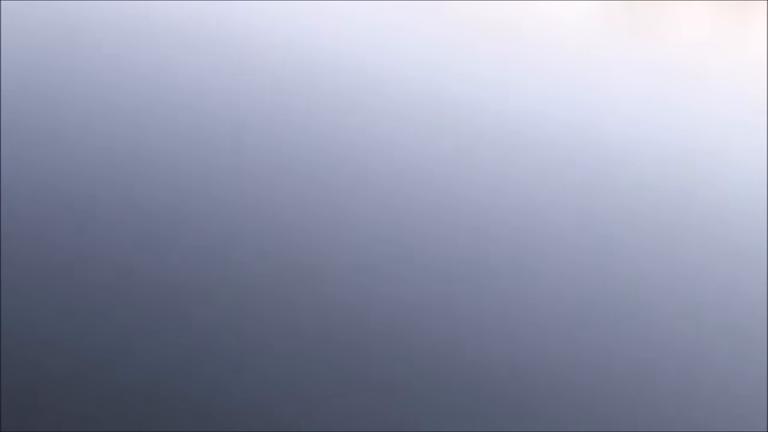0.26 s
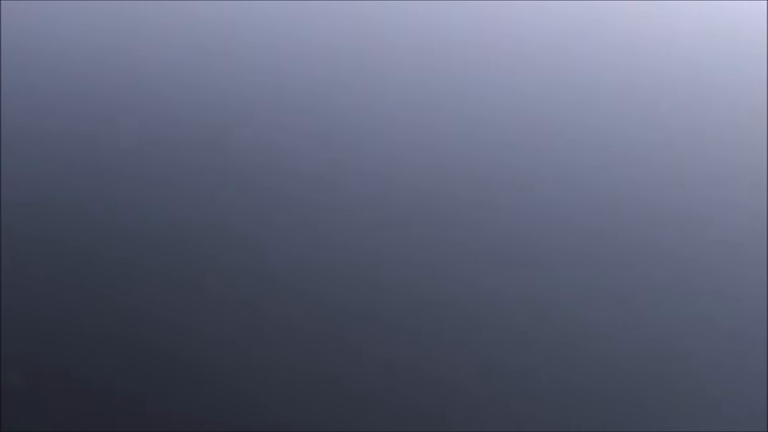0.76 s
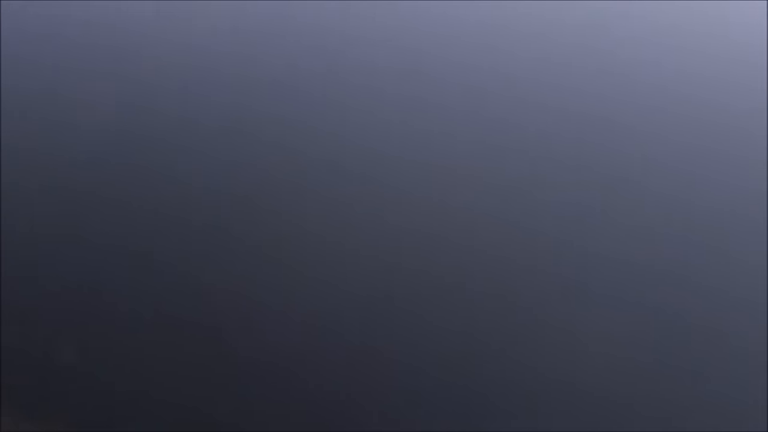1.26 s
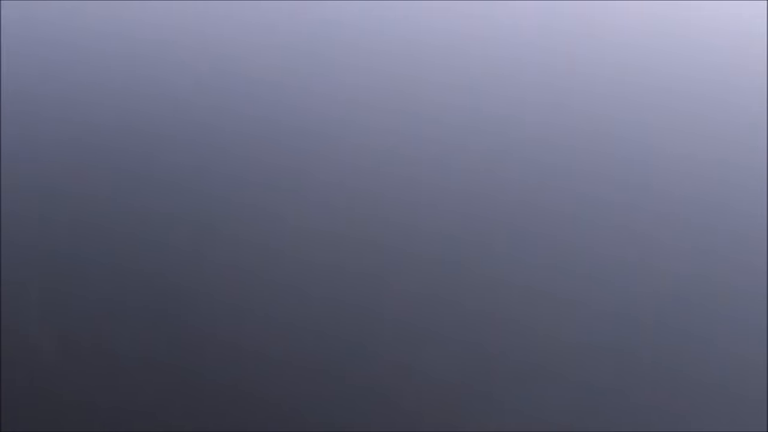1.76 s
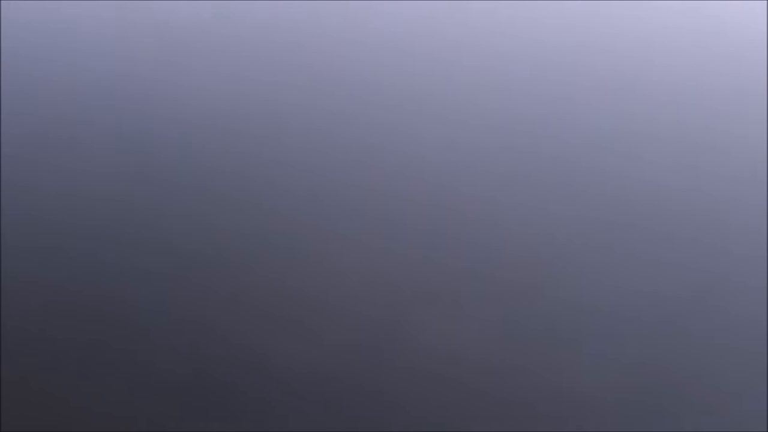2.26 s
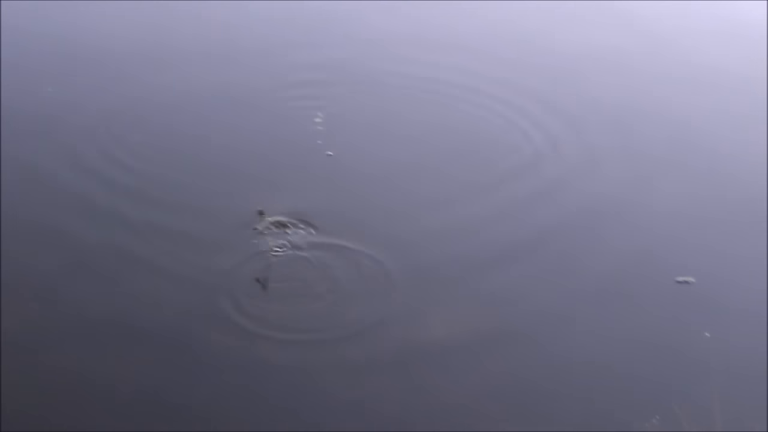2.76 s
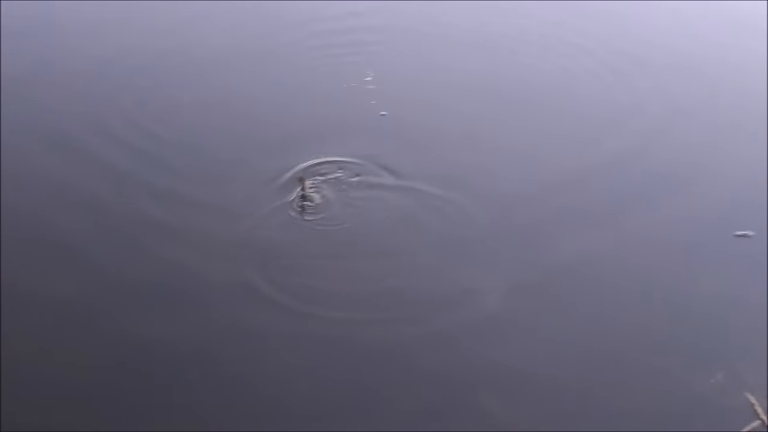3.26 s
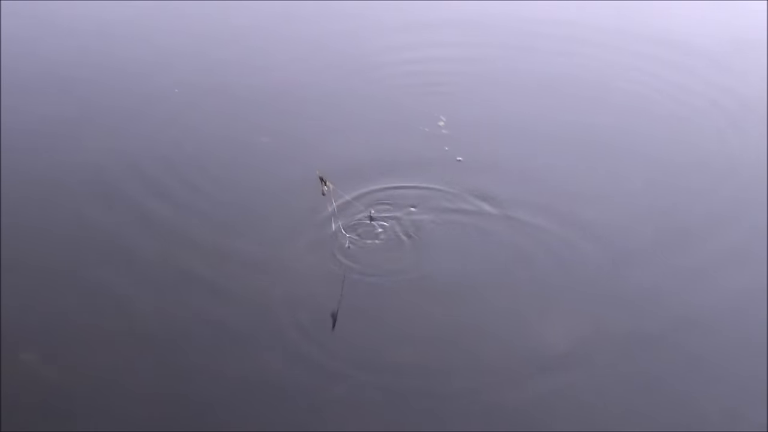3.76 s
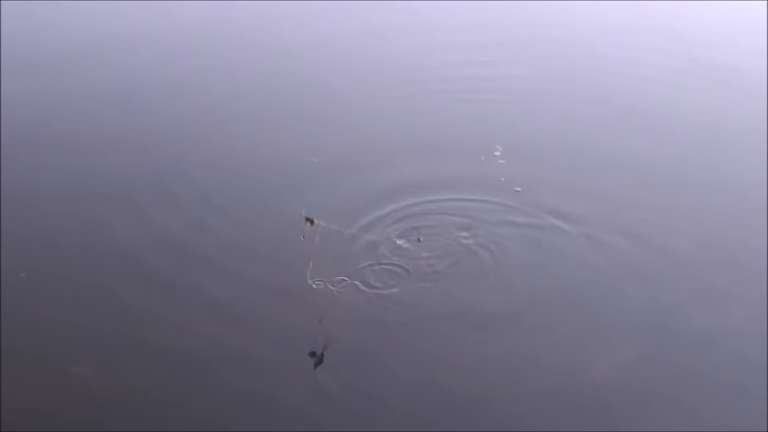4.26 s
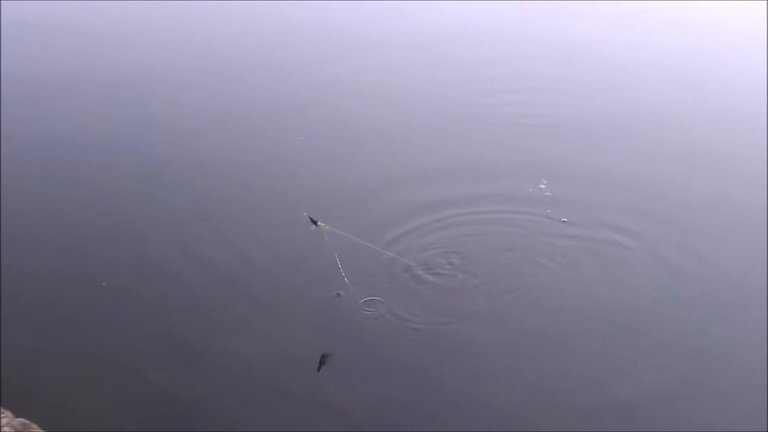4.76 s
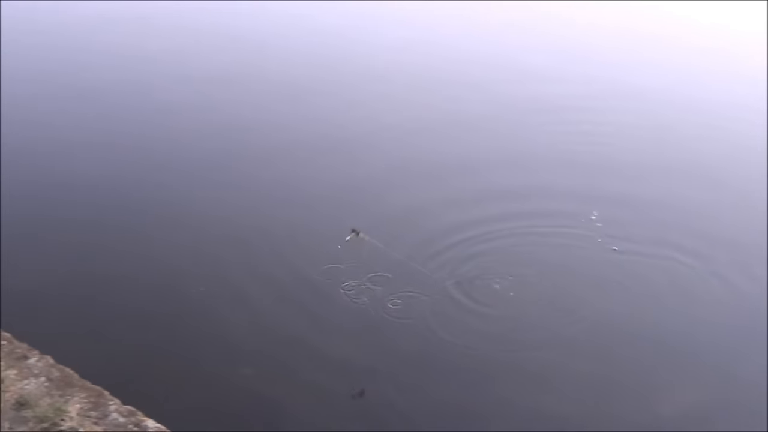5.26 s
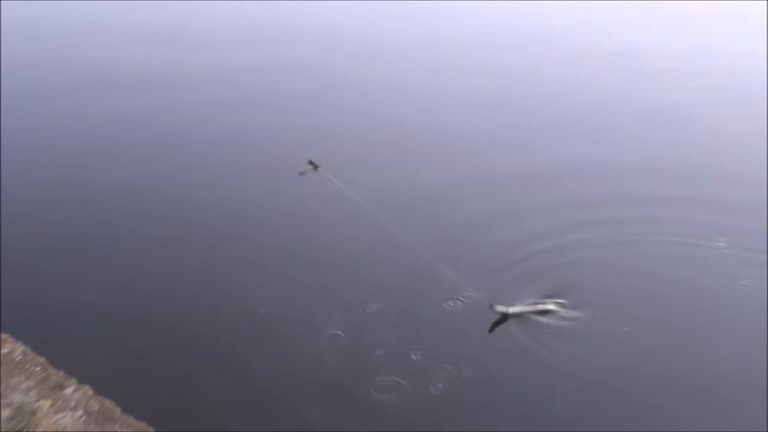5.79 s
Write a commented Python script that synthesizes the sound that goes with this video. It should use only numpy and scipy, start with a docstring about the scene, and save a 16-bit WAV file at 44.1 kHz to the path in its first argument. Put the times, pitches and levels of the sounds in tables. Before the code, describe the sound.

A small pellet bell on a fishing rod jingles in restless shakes beside a quiet lake, with clothing rustles, clicks and sharp coot calls echoing.

```python
"""A quiet lake: soft outdoor air (coloured noise) lies over a low distant hum, with a faint high whine.
Clothing rustles close by (flickering noise), and a small pellet bell on a fishing rod jingles as a hooked
fish tugs the line (decaying tones). Songbirds whistle far off (gliding tones); tackle clicks (short noise)
and soft bumps (damped notes) follow. Near 3 s a coot starts five sharp calls (strong overtones in bursts),
which echo from the bank."""
import sys
import numpy as np
from scipy import signal
from scipy.fft import rfft, irfft, next_fast_len
from scipy.io import wavfile
from scipy.ndimage import map_coordinates

SR = 44100
rng = np.random.default_rng(int(sys.argv[2]) if len(sys.argv) > 2 else 0)


def waveform_to_disk(signal):
    """Save audio, clipped to [-1, 1], as 16-bit WAV at the path in sys.argv[1]."""
    frames = np.transpose(np.atleast_2d(signal))
    scaled = np.clip(frames, -1, 1) * 32767
    samples = np.round(scaled).astype(np.int16)
    wavfile.write(sys.argv[1], SR, samples)


N = 265923


def amp(db):
    """Turn decibels into a gain."""
    return 10 ** (np.asarray(db) / 20)


def unit(x):
    """Scale x to an average (rms) level of 1."""
    return x / np.sqrt(np.mean(x ** 2) + 1e-20)


def fade(t, t60):
    """Die away exponentially, by 60 dB in t60 seconds."""
    return np.exp(-np.log(1000) * t / t60)


def seconds(length):
    """Give the sample times over a length in seconds."""
    return np.arange(int(length * SR)) / SR


def along(points, hz):
    """Read a curve of (frequency, value) points on a log frequency axis."""
    f, v = np.transpose(points)
    return np.interp(np.log(hz + 1), np.log(f + 1), v)


def over_time(points):
    """Draw straight lines through (time, value) points, over the whole scene."""
    return np.interp(np.arange(N) / SR, *np.transpose(points))


def left_right(db):
    """Left and right gains from a left-minus-right level in dB."""
    return amp(np.outer([.5, -.5], db))


def wobble(rate):
    """A smooth random curve with a new random knot `rate` times a second."""
    knots = rng.standard_normal(int(N * rate / SR) + 4)
    return map_coordinates(knots, [np.arange(N) * rate / SR])


def filtered(x, response):
    """Multiply the spectrum of x by a response, given as a function of frequency."""
    m = next_fast_len(N + SR // 2)
    return irfft(rfft(x, m) * response(np.fft.rfftfreq(m, 1 / SR)), m)[..., :N]


def add(track, s, sound):
    """Mix a sound into a track, starting at time s."""
    part = track[..., max(round(s * SR), 0):][..., :sound.shape[-1]]
    part += sound[..., :part.shape[-1]]


def noise(spectrum, alike):
    """Coloured stereo noise of rms 1; `alike` says how similar left and right are at each frequency."""
    def mid_side(hz):
        turn = np.arccos(np.clip(along(alike, hz), -1, 1)) / 2
        return amp(along(spectrum, hz)) * [np.cos(turn), np.sin(turn)]

    mid, side = filtered(rng.standard_normal((2, N)), mid_side)
    return unit(np.array([mid + side, mid - side]))


def echo(x, t60s, delay, build, width=0.19):
    """A diffuse stereo tail that builds up after a delay; each frequency dies at its own speed."""
    hz, _, z = signal.stft(rng.standard_normal((2, SR)), SR, nperseg=256)
    t = np.linspace(0, 1, z.shape[-1])
    shaped = z * fade(t, along(t60s, hz)[:, None]) * (1 - np.exp(-t / build))
    tail = signal.istft(shaped, SR, nperseg=256)[1]
    tail = tail / np.linalg.norm(tail[0])
    late = np.pad(x, (int(delay * SR), 0))[None]
    mid, side = signal.oaconvolve(late, tail, axes=1)[:, :N]
    return np.array([mid + width * side, mid - width * side])


# colour of the outdoor air: (frequency [Hz], level [dB per Hz])
AIR_COLOUR = [(20, -44), (35, -18), (65, -8.5), (210, -10), (330, -1), (600, -8.5), (880, -9), (1500, -17),
              (3000, -20), (4000, -23), (5200, -21.5), (8500, -24.5), (10900, -32.5), (15000, -29.5)]
# how similar the air is in both ears: (frequency [Hz], left-right likeness [share])
AIR_ALIKE = [(30, 0.46), (120, 0.84), (300, 0.95), (1000, 0.95), (4000, 1), (8000, 0.7), (13000, 1)]
# which side the air leans to: (frequency [Hz], left minus right level [dB])
AIR_LEAN = [(40, 10), (90, -0.5), (180, 4), (330, -7.5), (700, 1), (1400, -0.5), (3000, 0.5)]
# slow rise and fall of the low hum: (time [s], gain [dB])
HUM_GAIN = [(0, 1), (2.2, 2.65), (4, 2.5), (5.2, -1.5)]
AIR_DB = -48  # middle of the air's wandering level


def countryside(corner_hz=800):
    """Soft outdoor air; its low part, the distant hum, swells a little and then slowly ebbs."""
    air = noise(AIR_COLOUR, AIR_ALIKE) * amp(AIR_DB + 0.82 * wobble(3.41))
    air = filtered(air, lambda hz: left_right(along(AIR_LEAN, hz)))
    hum = filtered(air, lambda hz: 1 / (1 + (hz / corner_hz) ** 2))
    return air - hum + hum * amp(over_time(HUM_GAIN))


# strokes of a sleeve: (time of the peak [s], rise time constant [s], swish level [dB], rub level [dB])
SLEEVE_STROKES = [(.115, 0.14, -39.5, -54), (.275, 0.099, -35.5, -59), (0.416, 0.024, -36.5, -40.5),
                  (.715, 0.02, -50, -74), (1.075, 0.015, -34, -51.5), (1.257, 0.094, -32.5, -40.5),
                  (1.405, 0.082, -42.5, -44.5)]
# colour of the bright swish: (frequency [Hz], level [dB per Hz])
SWISH_COLOUR = [(1400, -17.5), (2400, -11.5), (3800, -16), (5500, -8.5), (7600, 2.5), (8800, -5.5),
                (10700, -17), (12500, -22), (15000, -30)]
# colour of the duller rub: (frequency [Hz], level [dB per Hz])
RUB_COLOUR = [(25, -20), (60, 5), (120, -2), (450, 7.5), (900, 5), (1400, 3.5), (2200, 0.5), (4000, -18)]
RELEASE_S = 0.052  # a stroke dies away with this time constant


def clothing(grain_db=4.0, crackle_db=-2, rate=130):
    """Fabric slides in tiny catches: a bright swish over a duller rub, crackling where it creases."""
    peak, rise, swish, rub = np.transpose(SLEEVE_STROKES)[..., None]
    t = np.arange(N) / SR - peak
    speed = np.exp(np.minimum(t / rise, -t / RELEASE_S))

    def level(db):
        return np.linalg.norm(amp(db) * speed, axis=0)

    catches = unit(amp(grain_db * wobble(350)))
    sliding = level(swish) * noise(SWISH_COLOUR, [(4000, 0.99)])
    sliding = sliding + level(rub) * noise(RUB_COLOUR, [(500, 0.99)])
    creases = (rng.random(N) < rate / SR) * rng.exponential(size=N)  # about `rate` a second
    snaps = unit(signal.oaconvolve(creases, fade(seconds(.01), 0.0069))[:N])
    colour = [(400, -12), (1500, -2), (2800, -3), (6000, -1), (12000, -33)]
    crackle = snaps * noise(colour, [(2000, 0.98)])
    return catches * sliding + level(rub + crackle_db) * crackle


PRESS_HZ = 406  # the main tone starts this much sharp
PRESS_S = .0006  # typical time constant of the pellet's press


def main_ring(t, t60, press_s=PRESS_S):
    """The shell's main tone swells in about a millisecond, briefly sharp while the pellet presses on it."""
    hz = 3998 + PRESS_HZ * np.exp(-t / press_s)
    return np.sin(2 * np.pi * np.cumsum(hz) / SR) * fade(t, t60) * (1 - np.exp(-t / press_s))


def clink(t, hz=4230, t60=0.012):
    """A light contact: a heavily damped note a little above the main tone."""
    return np.sin(2 * np.pi * hz * t) * fade(t, t60) * (1 - np.exp(-t / 0.00059))


FIRM_DB = -18  # strength of a firm strike, the reference for the settings below
RING_S, RING_GROWS = 0.046, 0.033  # t60 [s] after a firm strike, and its growth [1/dB, exponential]


def ring_time(db):
    """A harder strike throws the pellet clear, so the main tone rings longer: its t60."""
    return RING_S * np.exp(RING_GROWS * (db - FIRM_DB))


# the rod tip jerks and throws the pellet against the shell: (time [s], strength [dB])
STRIKES_ON_SHELL = [(0.011, -14), (0.066, -19), (0.1165, -19.5), (0.2189, -26.5), (0.3268, -21),
                    (0.414, -23), (0.5206, -26), (0.584, -20.5), (0.7042, -25), (0.9272, -26.5),
                    (0.9968, -28.5), (1.073, -18), (1.3268, -19.5), (1.4622, -29.5), (1.5169, -25.5),
                    (1.58, -24.5), (1.605, -22), (1.6452, -19), (1.6836, -22.5), (1.735, -20), (1.778, -11),
                    (1.7883, -13.5), (1.8377, -13.5), (1.8499, -9), (1.9071, -17.5), (1.966, -18.5),
                    (1.9886, -17), (2.0229, -14), (2.141, -20.5), (2.1685, -19), (2.218, -12),
                    (2.2895, -22.5), (2.37, -19), (2.4225, -14.5), (2.5046, -21.5), (2.5673, -11.5),
                    (2.59, -9.5), (2.6307, -16), (2.677, -16), (2.7427, -23), (2.8266, -22.5),
                    (2.8483, -18.5), (2.9308, -24), (2.974, -14.5), (2.9967, -20.5), (3.086, -20.5),
                    (3.2238, -25), (3.2829, -22), (3.3247, -15), (3.3446, -14), (3.4032, -15), (3.486, -15),
                    (3.542, -20), (3.5623, -18), (3.589, -14.5), (3.7294, -14.5), (3.804, -25),
                    (3.8496, -18.5), (3.9655, -18), (3.9889, -21.5), (4.0297, -22.5), (4.0474, -20),
                    (4.1135, -21), (4.1785, -26), (4.2494, -30.5), (4.2909, -20), (4.571, -19.5),
                    (4.6393, -22.5), (4.6859, -20), (4.7786, -24), (4.825, -18), (4.855, -24),
                    (4.8942, -27.5), (4.9202, -23), (4.9443, -24.5), (5.0609, -31), (5.251, -18.5),
                    (5.3625, -14.5), (5.4395, -9.5), (5.4825, -17.5), (5.5119, -13.5), (5.6502, -17),
                    (5.7195, -19), (5.7319, -20), (5.755, -21.5), (5.9171, -18), (6.004, -19.5)]
FLIGHT_S = .018  # typical time in the air between rebounds
FIRST_LOSS_DB, LOSS_DB = 6.5, 4.5  # typical loss at a firm strike's first rebound and at each later one
HARD_LOSS = 0.24  # extra first loss [dB] for each dB that a strike exceeds FIRM_DB


def contacts(count=4, uneven=.3, spread_db=2.6, damping=0.49):
    """Each strike and its mostly weakening rebounds before the next: rows (time [s], level [dB], t60 [s])."""
    rows = []
    ends = [row[0] for row in STRIKES_ON_SHELL[1:]] + [N / SR]
    for (s, db), end in zip(STRIKES_ON_SHELL, ends):
        flight, force, grip = rng.standard_normal((3, count))
        times = s + np.cumsum(FLIGHT_S * np.exp(uneven * flight))
        first = db - FIRST_LOSS_DB - HARD_LOSS * (db - FIRM_DB)
        levels = first - LOSS_DB * np.arange(count) + spread_db * force
        lives = ring_time(levels) * np.exp(damping * grip)
        rows.append((s, db, ring_time(db)))
        rows += [row for row in zip(times, levels, lives) if row[0] < end - FLIGHT_S / 2]
    return rows


# typical side tones of the shell: (frequency [Hz], level relative to the strike [dB], t60 [s])
SHELL_MODES = [(3722, -23.5, 0.085), (8847, -24, 0.057), (10265, -31.5, 0.052)]


def rattle(shake, rate=260, rattle_db=-21, upper_db=10):
    """Between strikes the pellet skitters round the shell; many light taps stir all of its tones."""
    t = seconds(.15)
    taps = (rng.random(N) < rate / SR) * rng.standard_normal(N) * shake
    shell = sum(amp(db + upper_db) * np.sin(2 * np.pi * hz * t) * fade(t, life)
                for hz, db, life in SHELL_MODES)
    return amp(rattle_db) * signal.oaconvolve(taps, main_ring(t, 0.026) + clink(t) + shell)[:N]


# the rod tip drifts from right to left: (time [s], left minus right level [dB])
BELL_SIDE = [(0, -1.5), (2, 0), (6, 1)]


def bell(clink_db=-5.5, tick_db=-26.0, tick_spread_db=4.5, scatter_db=4, detune=0.0025, settle=0.2,
         chatter=0.46, light_clink=0.15, press_spread=.3):
    """Each contact stops the old main ring, starts a new one with clink and tick, and sets off a rattle."""
    ring, ticks, shake = np.zeros((3, N))
    t = seconds(.2)
    hits = contacts()
    gaps = np.diff([row[0] for row in hits], append=N / SR)
    for (s, db, t60), gap in zip(hits, gaps):
        place, force, click, press = rng.standard_normal(4)
        stopped = np.exp(-np.maximum(t - gap, 0) / 0.0013)
        add(ring, s, amp(db) * main_ring(t, t60, PRESS_S * np.exp(press_spread * press)) * stopped)
        # light contacts clink relatively more
        clink_level = db + clink_db + light_clink * (FIRM_DB - db) + 2 * force
        add(ring, s, amp(clink_level) * clink(t * (1 + 0.024 * place)))
        for hz, level, life in SHELL_MODES:
            size, shift, damping = rng.standard_normal(3)  # these depend on where the pellet lands
            mode = np.sin(2 * np.pi * hz * (1 + detune * shift) * t) * fade(t, life * np.exp(.3 * damping))
            add(ring, s, amp(db + level + scatter_db * size) * mode)
        # light contacts tick relatively more
        add(ticks, s, amp(0.83 * db + tick_db + tick_spread_db * click) * fade(t, 0.019))
        add(shake, s, amp(db) * fade(t, settle))
    colour = [(500, -15), (2500, -10), (4500, 10.0), (6000, 9.5), (8200, 12.0), (10000, 3), (15000, -26)]
    tick = ticks * noise(colour, [(4000, 0.85)])
    # the pellet grazes the ringing shell: level and phase of the tone both flutter
    graze = np.exp(chatter * (.5 * wobble(260) + 1j * wobble(260)))
    fluttering = np.real(signal.hilbert(ring, next_fast_len(N))[:N] * graze)
    jingle = fluttering + rattle(shake)
    tail = amp(-13.5) * echo(jingle, [(4000, 0.064)], delay=0.0015, build=0.00065, width=0.14)
    return left_right(over_time(BELL_SIDE)) * (jingle + tick + tail)


# songbird notes, levels before the common trim: (time [s], length [s], crest pitch [Hz],
# glide over the note [share], arch [share], level [dB], warble [share])
SONG_NOTES = [(0.101, .15, 2170, 0, 0.05, -54, 0.0046), (1.851, 0.23, 1890, -0.0016, 0.11, -60.5, 0.0034),
              (2.062, 0.19, 2163, -0.068, 0.11, -50, .003), (2.335, .06, 2560, .2, .04, -58, 0.044),
              (2.41, .1, 8700, -.025, 0.053, -53, .003), (2.65, .09, 8550, -.035, .015, -53, .008),
              (2.675, .035, 2633, .06, 0.13, -56, .01), (2.752, 0.38, 5440, -.07, -.08, -55, .056),
              (3.056, .22, 3036, -.03, .04, -65, 0.019), (3.163, 0.092, 8150, .015, 0.088, -46, .014),
              (3.246, 0.4, 5474, -0.1, -.02, -53, 0.064), (3.602, .08, 3110, .055, .03, -61.5, 0.011),
              (4.023, 0.18, 2100, -.13, -0.012, -58, .005), (4.324, 0.137, 2620, -0.07, .03, -65, .01),
              (4.877, 0.089, 2740, 0.055, .01, -61.5, 0.022), (5.011, 0.077, 3740, 0.052, 0.2, -56, .01),
              (5.94, .09, 2412, -0.11, 0.00056, -56.5, 0.0055)]
# how long the bank's echo lasts, also used for the blur of the trees: (frequency [Hz], t60 [s])
BANK_ECHO = [(300, 1), (2200, 0.75), (4000, 0.57), (8000, 0.45), (14000, 0.12)]


def songbirds(level_db=1.5):
    """Distant gliding and arching whistles, some chirring, blurred by the trees."""
    song, warble = np.zeros(N), wobble(900)
    for s, length, hz, glide, arch, db, depth in SONG_NOTES:
        u = seconds(length) / length  # 0 to 1 over the note
        tune = hz * (1 + glide * (u - .5) - arch * (2 * u - 1) ** 2)
        pitch = tune * (1 + depth * warble[int(s * SR):][:len(u)])
        whistle = np.sin(2 * np.pi * np.cumsum(pitch) / SR) * np.abs(np.sin(np.pi * u)) ** .5
        add(song, s, amp(db + level_db) * unit(whistle))
    return song + amp(-5) * echo(song, BANK_ECHO, delay=.005, build=.003)


# clicks of the tackle, before the common trim: (time [s], click level [dB], knock relative to click [dB])
TACKLE_CLICKS = [(0.2878, -5.5, -28), (1.1204, -8, -42), (1.183, -23, -21), (1.2469, -26, -12),
                 (1.496, -17.5, -20), (1.7305, -22.5, -22), (1.7589, -19, -18.5), (1.8012, -22.5, -11.5),
                 (2.245, -19.5, -9), (2.6321, -23, -13), (4.128, -34.5, -4.5), (4.191, -26, -14),
                 (4.462, -27.5, -24)]
# colour of the hard click: (frequency [Hz], level [dB])
SNAP_COLOUR = [(1500, -31), (3000, -3.5), (5500, 3), (7500, 12.5), (9000, 2.5), (12000, -10.5),
               (16000, -31)]
# colour of the duller knock: (frequency [Hz], level [dB])
DULL_COLOUR = [(100, -34), (400, 15.5), (900, 4.5), (2500, 13.5), (5000, -17)]


def tackle(level_db=-3):
    """Hard little clicks of rod and reel, each with a duller knock: short fading bursts of noise."""
    snaps, knocks, t = np.zeros(N), np.zeros(N), seconds(.1)
    for s, db, knock in TACKLE_CLICKS:
        snap = (fade(t, 0.012) + 0.076 * fade(t, 0.1)) * (1 - np.exp(-t / 0.0006))
        add(snaps, s, amp(db + level_db) * snap)
        add(knocks, s, amp(db + knock + level_db) * fade(t, 0.065))
    return snaps * noise(SNAP_COLOUR, [(4000, 0.96)]) + knocks * noise(DULL_COLOUR, [(1000, 0.95)])


# soft bumps close by: (time [s], level [dB], pitch [Hz])
SOFT_BUMPS = [(.413, -25.5, 487), (1.421, -27, 385)]
BUMP_S = 0.044  # t60 of a bump


def bumps(attack_s=0.0018, thud_db=-8):
    """Each bump is one dull, well damped note with a little noisy thud around it."""
    note, push, t = np.zeros(N), np.zeros(N), seconds(.1)
    for s, db, hz in SOFT_BUMPS:
        shape = amp(db) * fade(t, BUMP_S) * (1 - np.exp(-t / attack_s))
        add(note, s, shape * np.sin(2 * np.pi * hz * t))
        add(push, s, shape)
    colour = [(100, -12), (450, 0), (1000, -8), (3000, -22), (6000, -50)]
    return note + amp(thud_db) * push * noise(colour, [(500, 0.89)])


# coot calls: (time [s], pitch [Hz], level [dB], stutter [0-1: from one even note to separate yelps])
COOT_CALLS = [(2.941, 1127, -23.5, 0.83), (3.779, 1126, -21, 0.34), (4.504, 1143, -18, 0.91),
              (5.173, 1144, -17, 0.92), (5.807, 1140, -18, 1)]
# the four bursts of a full stutter: (delay [s], length [s], pitch shift [share], level [dB])
CALL_BURSTS = [(0, 0.0047, 0.066, -8.5), (.0068, .0078, 0, -1), (0.0146, .012, .003, -0.5),
               (0.024, 0.014, -0.082, -5.5)]
# how the throat colours the overtones: (frequency [Hz], level [dB])
THROAT_COLOUR = [(1100, -7.5), (2250, 1), (3350, 2), (4500, -6), (5700, -7.5), (6900, -4), (8000, -5),
                 (9200, -20), (11000, -44)]
# which side the coot leans to: (frequency [Hz], left minus right level [dB])
COOT_SIDE = [(1100, -2.5), (3400, -1), (7500, -6)]


def coot(arch=0.074, rough=0.011, near_db=-11, wet_db=-21, swell=0.5):
    """Overtones shaped by the throat, broken into bursts; pitch and loudness arch within each burst."""
    calls, jitter = np.zeros((2, N)), wobble(900)
    order = np.arange(1, 10)[:, None]  # overtone numbers
    delay, length, shift, burst_db = np.transpose(CALL_BURSTS)[..., None]
    t = seconds(np.max(delay + length))
    u = np.clip((t - delay) / length, 0, 1)  # 0 to 1 over each burst
    bursts = amp(burst_db) * np.abs(np.sin(np.pi * u)) ** swell
    loudness = bursts.sum(axis=0)
    bends = shift + arch * (.15 - (2 * u - 1) ** 2)
    swing = np.sum(bursts * bends, axis=0) / (loudness + 1e-6)
    # one unbroken note, starting where the second burst does
    even = np.abs(np.sin(np.pi * np.interp(t, [delay[1, 0], t[-1]], [0, 1]))) ** swell
    for s, hz, db, stutter in COOT_CALLS:
        pitch = hz * (1 + stutter * swing + rough * jitter[int(s * SR):][:len(t)])
        overtones = np.sin(2 * np.pi * order * np.cumsum(pitch) / SR)
        pulses = np.sum(amp(along(THROAT_COLOUR, order * pitch)) * overtones, axis=0)
        effort = stutter * loudness + (1 - stutter) * even
        call = amp(db) * unit(pulses) * effort
        near_shore = echo(call, [(3000, 0.23)], delay=0.011, build=0.0018, width=0.36)
        add(calls, s, call)
        add(calls, s, amp(near_db) * near_shore)
        add(calls, s, amp(wet_db) * echo(call, BANK_ECHO, delay=.03, build=0.05))
    return filtered(calls, lambda hz: left_right(along(COOT_SIDE, hz)))


def scene():
    """Everything heard from the shore."""
    return countryside() + clothing() + bell() + songbirds() + tackle() + bumps() + coot()


WHINE_HZ, TOP_HZ = 15625, 15850  # pitch of the whine; nothing is kept from the second one up


def record(dry, whine_db=-69):
    """Add a faint high whine, buzzing 50 times a second, and cut everything above the band limit."""
    t = np.arange(N) / SR
    buzz = 1 + .7 * np.cos(2 * np.pi * 50 * t)
    whine = amp(whine_db) * unit(buzz * np.sin(2 * np.pi * WHINE_HZ * t))
    return filtered(dry + whine, lambda hz: hz < TOP_HZ)


dry = scene()
out = record(dry)
waveform_to_disk(out)
```